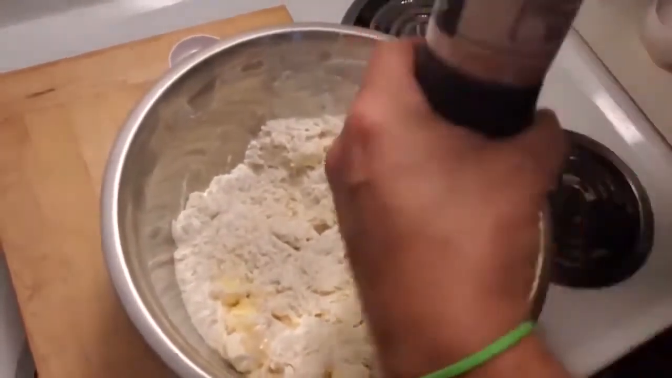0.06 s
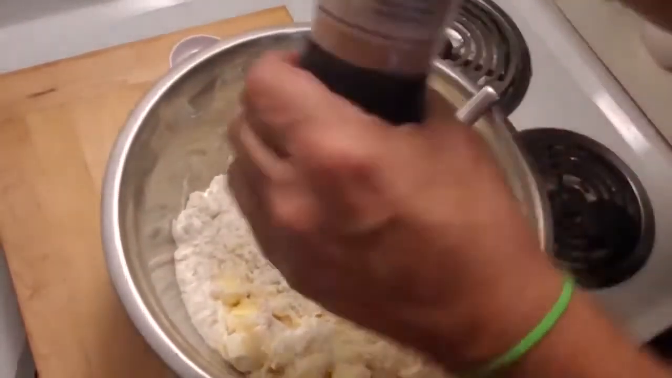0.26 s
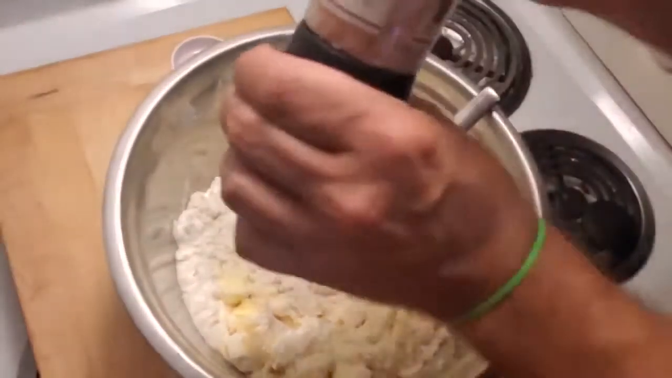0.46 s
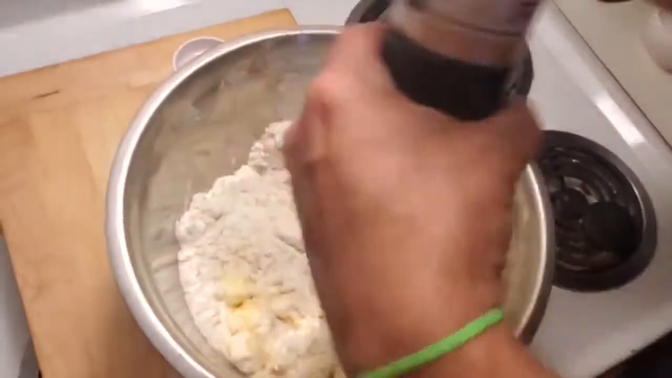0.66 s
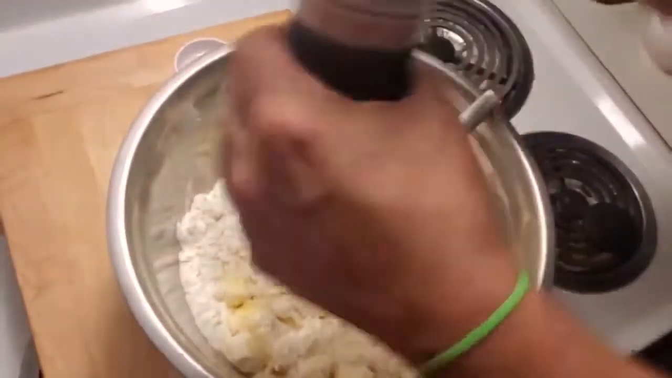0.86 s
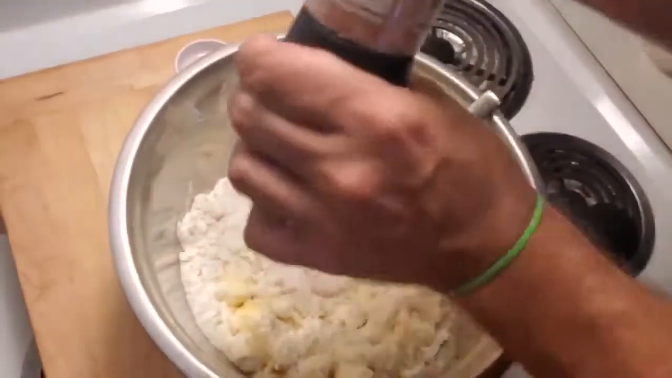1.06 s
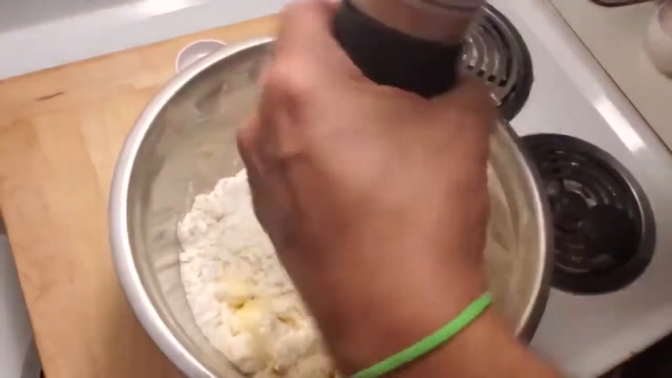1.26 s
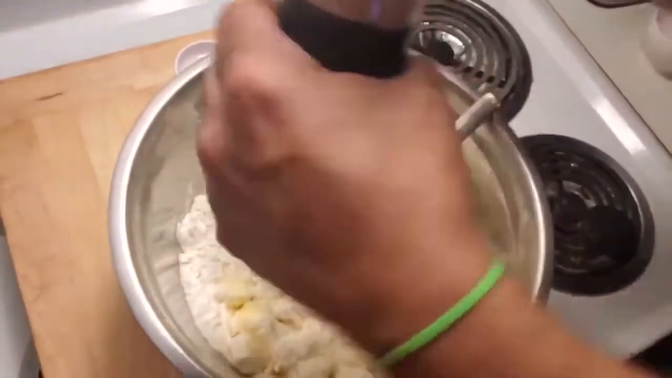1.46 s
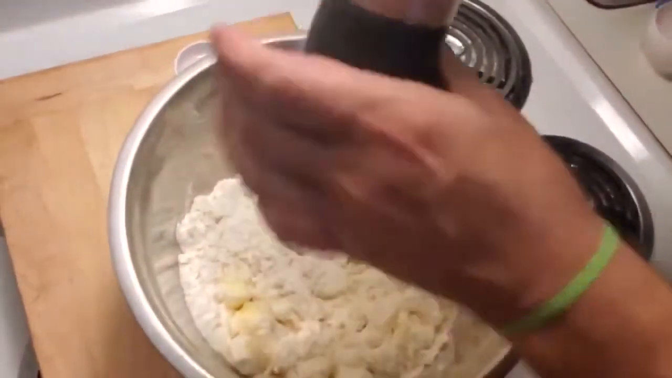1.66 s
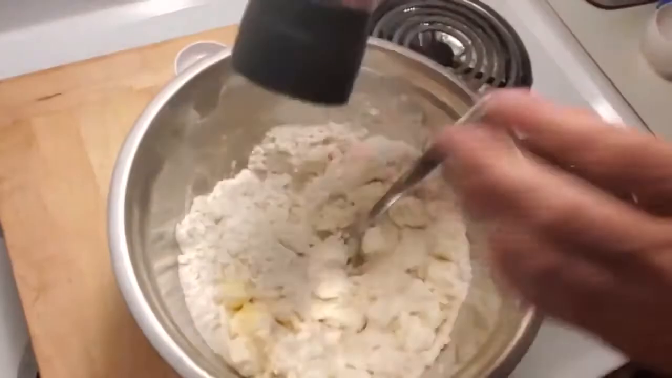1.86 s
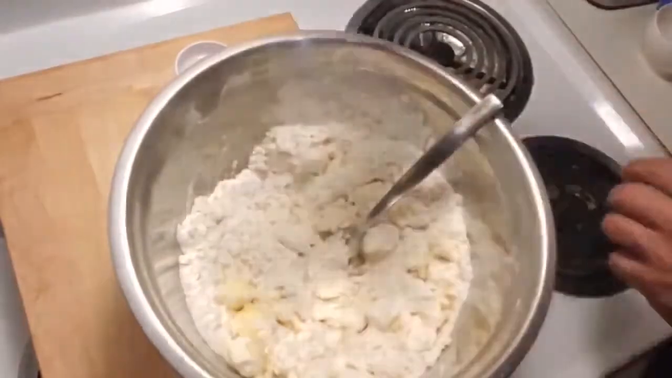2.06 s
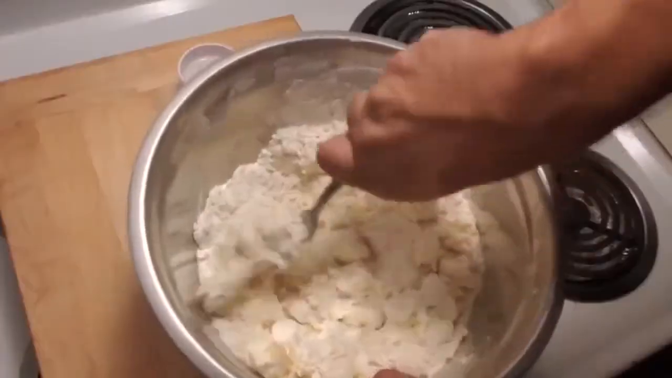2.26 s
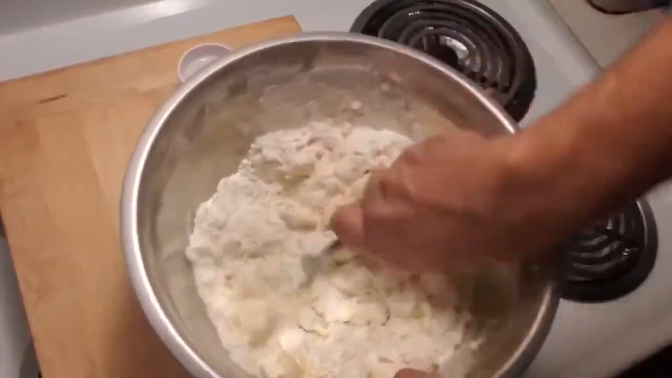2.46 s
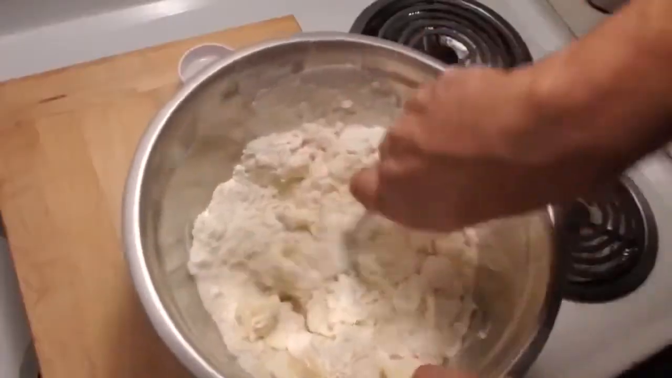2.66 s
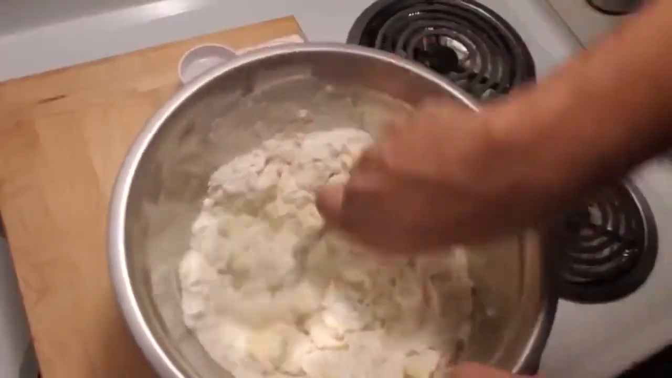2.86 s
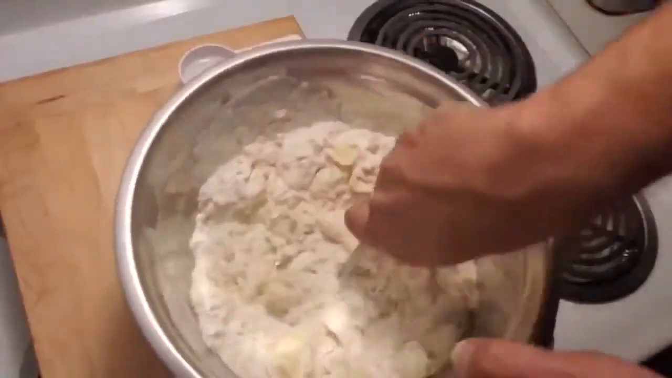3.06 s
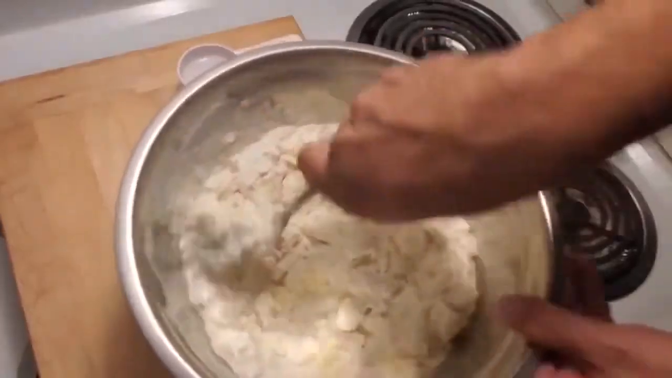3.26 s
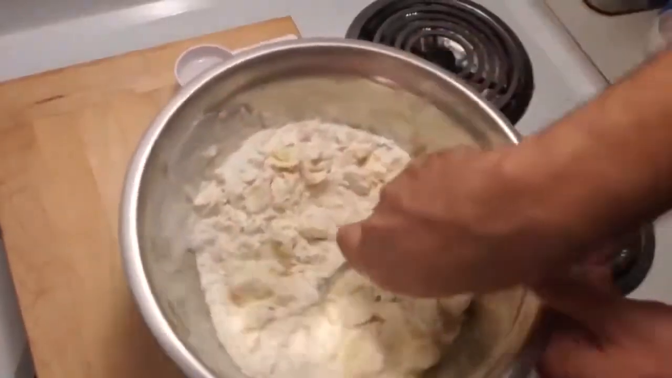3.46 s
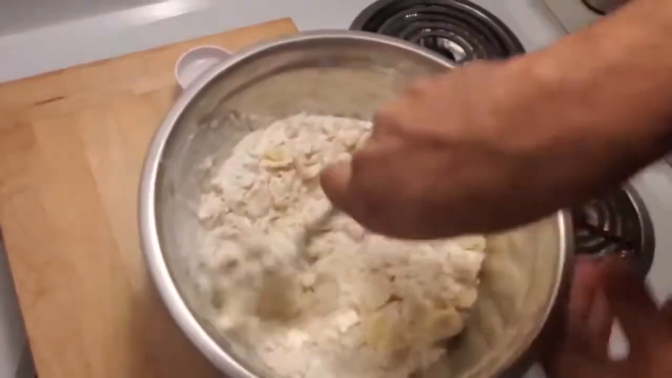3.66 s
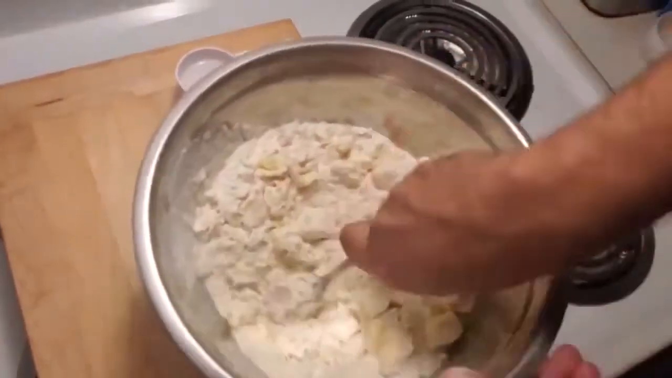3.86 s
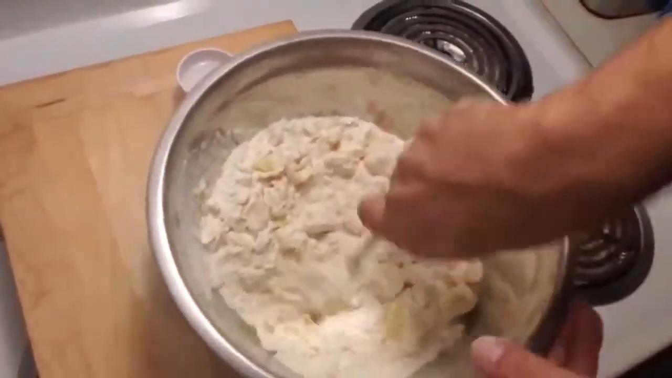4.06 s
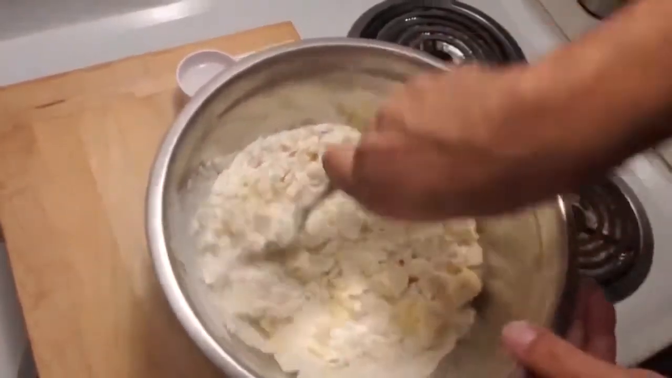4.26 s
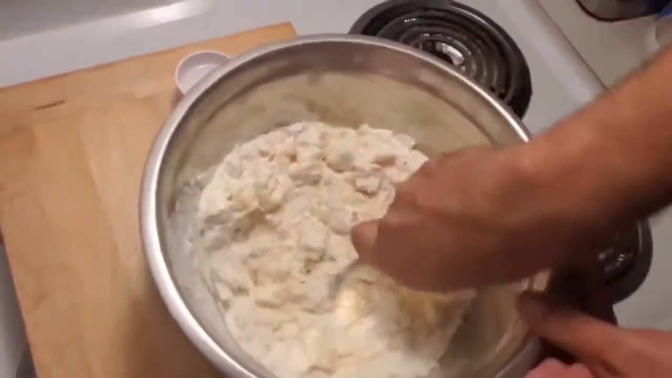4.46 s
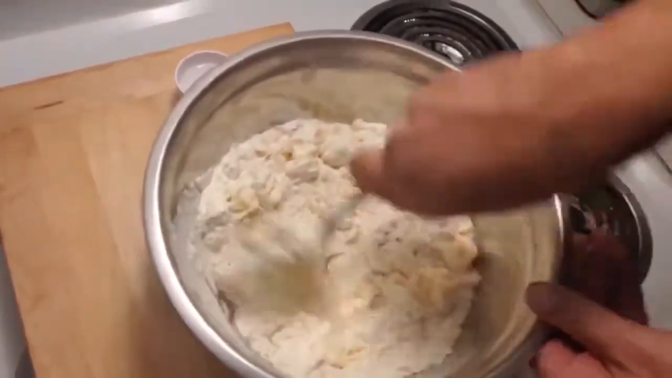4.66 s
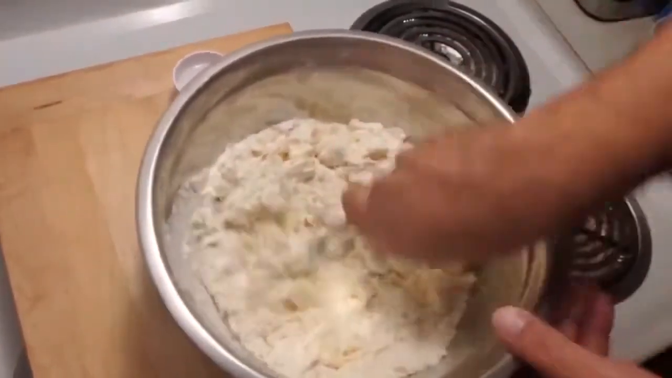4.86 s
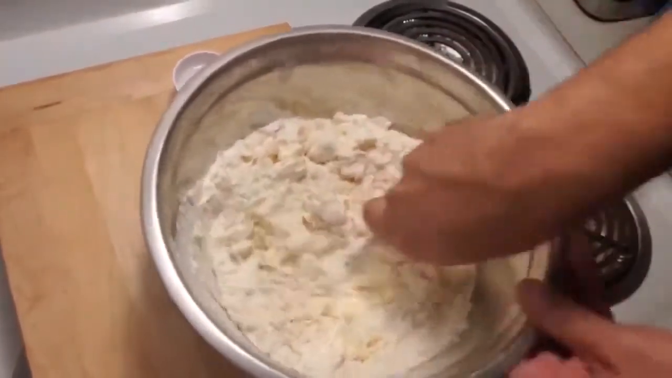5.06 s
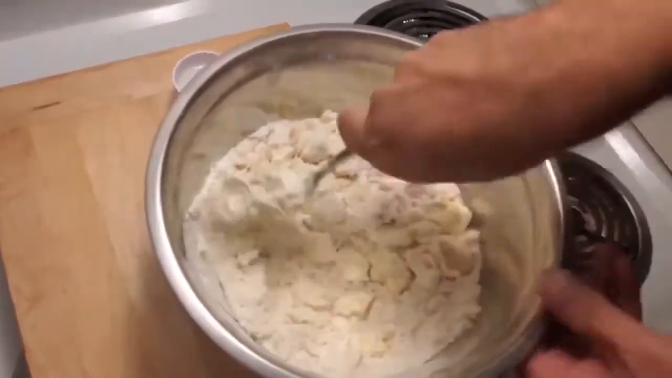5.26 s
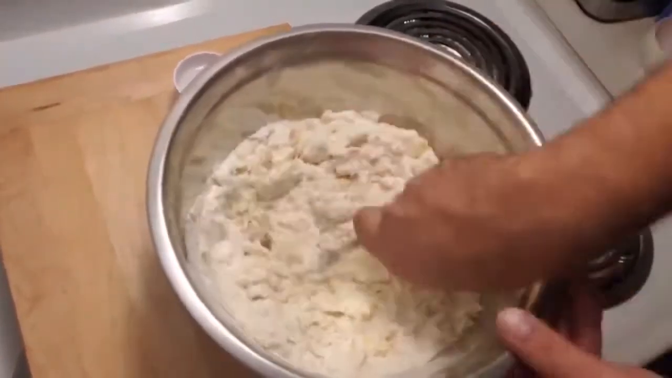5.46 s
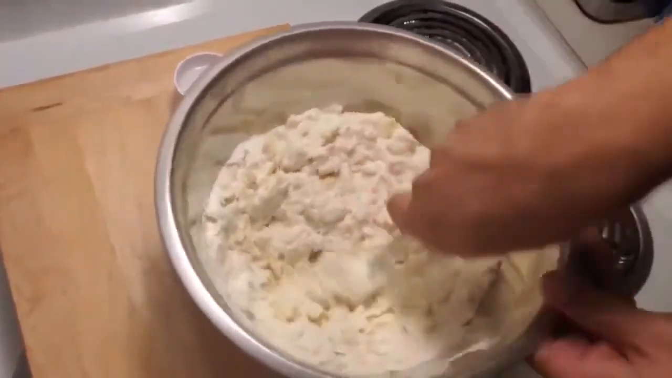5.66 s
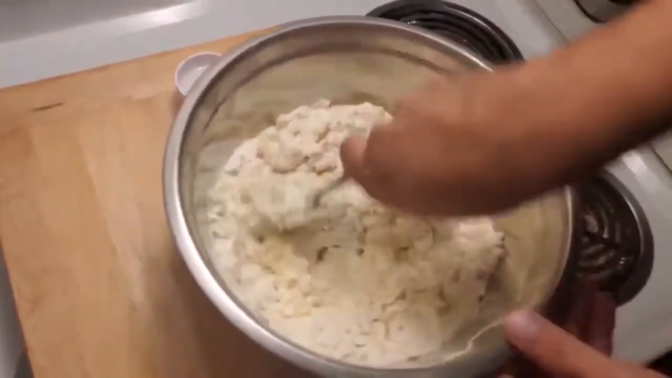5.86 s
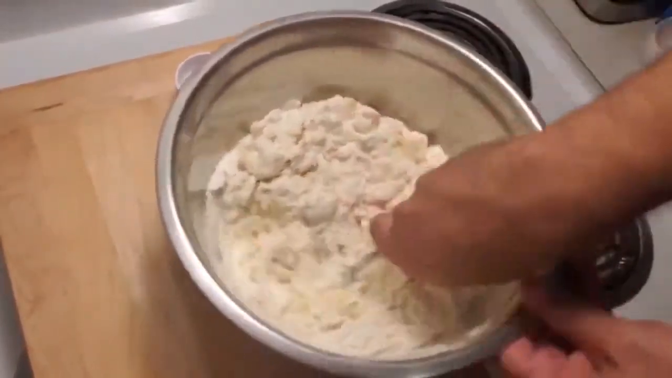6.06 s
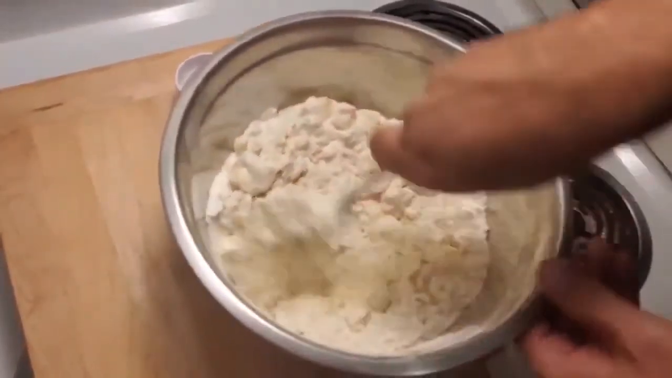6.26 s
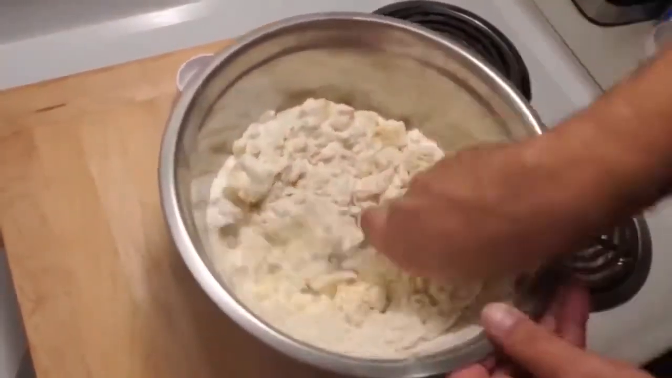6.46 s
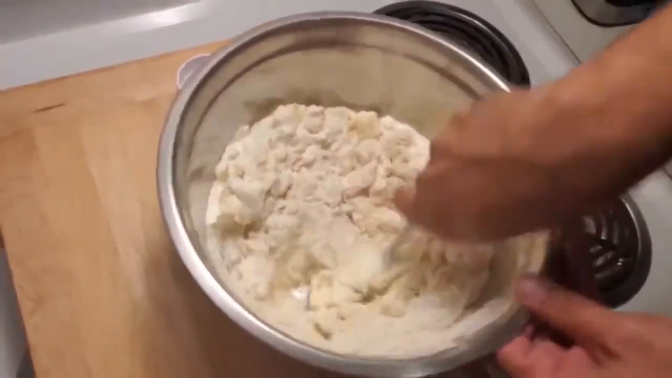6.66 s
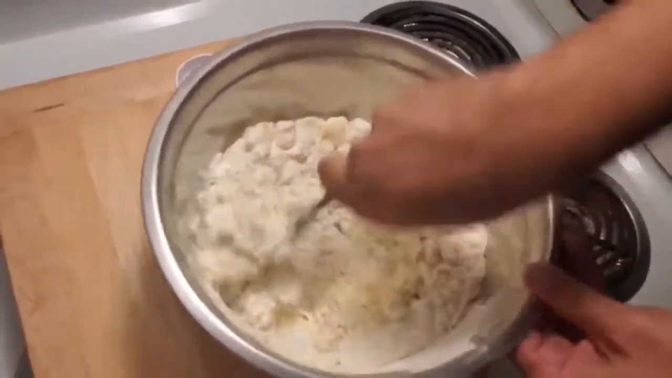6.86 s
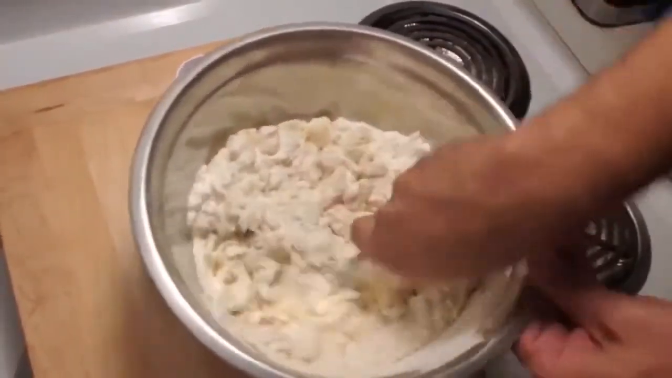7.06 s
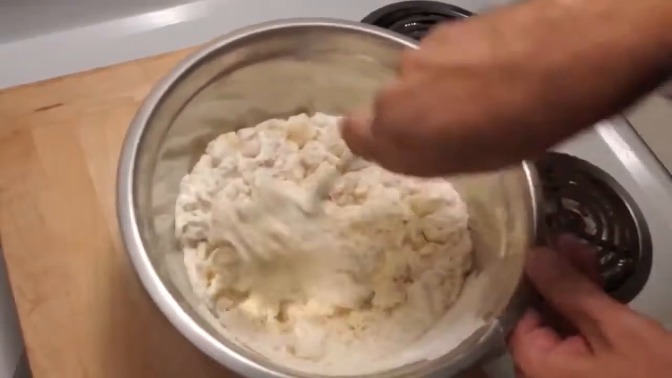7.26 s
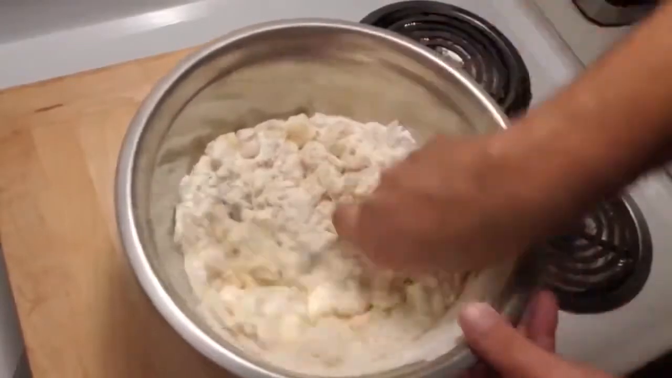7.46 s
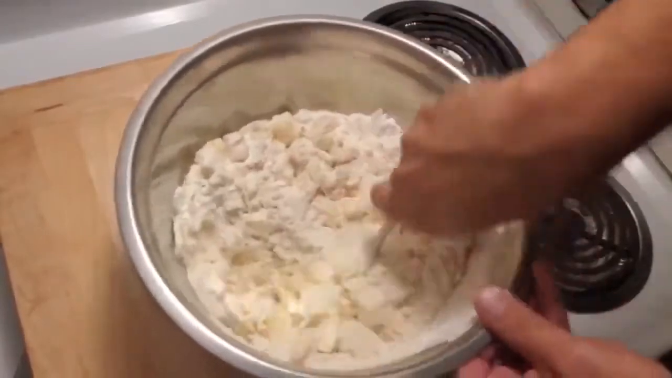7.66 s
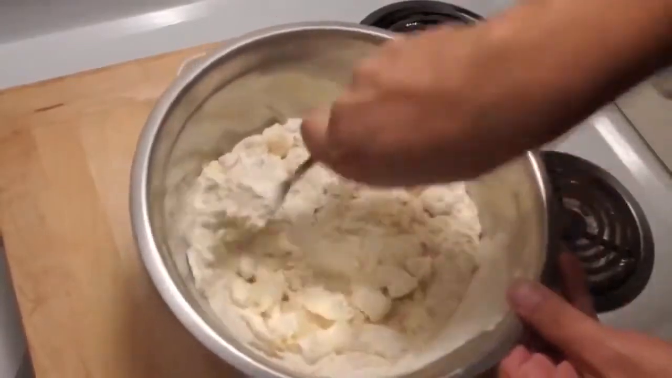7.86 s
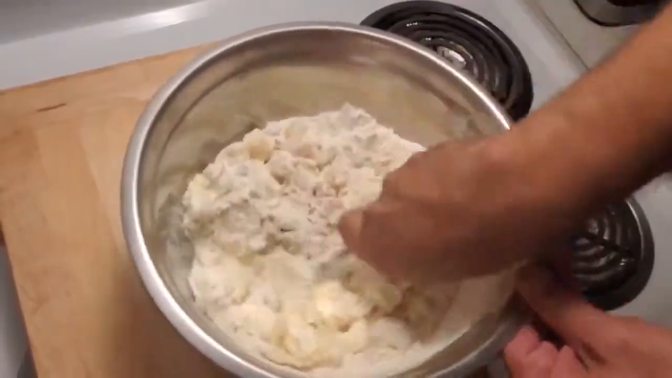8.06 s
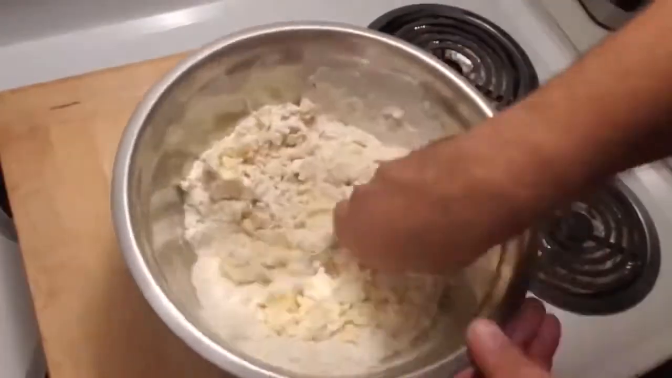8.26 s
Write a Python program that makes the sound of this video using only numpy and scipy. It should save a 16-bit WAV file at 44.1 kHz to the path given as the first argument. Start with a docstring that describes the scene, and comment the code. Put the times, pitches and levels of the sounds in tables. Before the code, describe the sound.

Close up in a quiet home kitchen, a hand mill crushes salt in uneven twists, with sharp crackles, gritty rasp and a hollow ring from its jar and casing. After about two seconds it stops, and a fork stirs flour and butter in a metal bowl, in regular soft hissing, rubbing strokes with occasional dull thuds and faint metallic clinks. Low room noise and refrigerator hum stay underneath.

```python
"""Salt mill and stirring fork

Close up in a kitchen, a hand mill crushes salt over a steel bowl: fine noise makes the grinding, short
bursts make the cracking crystals, and both set off the boom of the air in the jar and the ringing casing.
Then a fork stirs flour and butter: swells of gritty noise hiss and rub, coloured noise swells scrape, and
short thuds and rings knock the bowl on its board. A humming refrigerator and room noise lie underneath."""
import sys
import numpy as np
from scipy import signal
from scipy.fft import rfft, irfft, next_fast_len
from scipy.io import wavfile
from scipy.ndimage import uniform_filter1d, map_coordinates

SR = 44100
rng = np.random.default_rng(int(sys.argv[2]) if len(sys.argv) > 2 else 0)


def to_wav(s):
    """Save 16-bit WAV."""
    ch = np.atleast_2d(s).T  # columns
    pcm = np.round(np.clip(ch, -1, 1) * 32767)  # PCM
    wavfile.write(sys.argv[1], SR, pcm.astype(np.int16))


N = 367353  # length in samples

# Colour of the room noise: f/Hz, relative level/dB
ROOM_COLOUR = [(20, -11), (113, 1), (187, -10), (248, -3), (388, -5), (574, -18), (678, -14.5),
               (1960, -34.5), (3160, -44), (3530, -40), (6180, -38.5), (7520, -47), (12400, -40),
               (16000, -43.5)]
# Hum of the refrigerator: f/Hz, relative level/dB
FRIDGE_HUM = [(60, -68), (120, -63), (240, -64.5)]
# How alike the room noise is at left and right: f/Hz, likeness (1 = the same)
ROOM_LIKENESS = [(60, 0.94), (240, 1), (950, 0.0087), (3770, 0.08)]
# How far each source leans to the left: f/Hz, left above right/dB
MILL_LEAN = [(60, 2), (240, 5), (950, 8.5), (3770, 2.5), (15000, -3)]
BOWL_LEAN = [(60, 6), (380, 4.5), (2380, 10.5), (15000, -4)]

# Short coloured scrapes and bumps: loudest at t/s, level/dB, f/Hz, length/s
SCRAPE_SWELLS = [(2.824, -64, 1206, 0.031), (3.36, -67, 3930, 0.038), (4.542, -55.5, 5030, 0.029),
                 (5.875, -70.5, 1590, 0.067), (6.32, -55, 1990, 0.021), (6.344, -47.5, 84.5, 0.076),
                 (6.846, -50.5, 690, 0.028), (6.849, -58, 1230, 0.03), (7.12, -56, 1060, 0.022),
                 (7.328, -65, 960, 0.033), (7.847, -56, 840, 0.031)]
# Laps of the fork, a push then a pull: push t/s, rise/s, hiss level/dB, rub level/dB,
# pull later by/s, pull hiss level/dB, pull rub level/dB, trail/s (rise and trail span 20 dB)
FORK_LAPS = [(2.646, 0.095, -67, -68, 0.13, -67, -61, 0.36),
             (3.082, .12, -70.5, -67, 0.13, -69.5, -65.5, 0.46),
             (3.544, 0.036, -45, -55.5, 0.19, -60.5, -63.5, 0.1),
             (4.051, 0.087, -63, -59, 0.12, -68.5, -64.5, 0.38),
             (4.535, 0.044, -50, -54, 0.1, -67, -67.5, 0.26),
             (5.088, 0.076, -64, -65.5, 0.19, -71.5, -67, 0.31),
             (5.617, 0.14, -64.5, -65.5, 0.21, -65, -63.5, 0.17),
             (6.13, 0.078, -59.5, -64, 0.22, -60.5, -51.5, 0.11),
             (6.636, 0.082, -64, -63.5, 0.2, -63, -58.5, 0.19),
             (7.121, 0.052, -51, -55, 0.21, -63, -59, 0.12),
             (7.665, .1, -60.5, -61, 0.18, -65.5, -59, 0.17),
             (8.083, 0.0028, -49.5, -49, 0.049, -58, -57, 0.22)]
# Fork knocking the bowl: t/s, relative thud level/dB, thud f/Hz, relative ring level/dB, relative tick level/dB
BOWL_KNOCKS = [(3.509, -40, 242, -75, -66), (4.081, -55, 255, -59.5, -68), (6.283, -31.5, 160, -64, -57),
               (6.313, -48, 72.7, -48.5, -57), (6.358, -49, 73, -48, -71), (6.41, -47, 109, -63, -71),
               (6.728, -45, 67.6, -77, -75), (6.756, -47, 99, -56, -58), (7.852, -44, 514, -64, -67.5),
               (8.0824, -31, 288.5, -65, -43)]
# Colours of the flour's hiss and the dough's rub: f/Hz, relative level/dB
FLOUR_COLOUR = [(880, -27), (1500, -4.5), (1720, -11), (3030, -13.5), (3480, -4), (6830, -6.5),
                (7690, -8.5), (12600, -4), (16000, -12.5)]
DOUGH_COLOUR = [(180, -36), (300, -16), (527, -2.5), (587, -13.5), (662, -7), (1940, -23), (4000, -34),
                (5200, -71.5)]
# Resonances of the bowl on its board, the bowl wall and the fork's prongs: f/Hz, width/Hz, level/dB
BOARD_MODES = [(87, 28, 4), (247, 160, 8), (310, 94, 5.5), (630, 120, 13.5), (1066, 170, 32.5)]
STEEL_MODES = [(1682, 86, -1), (2212, 29, -1.5), (3520, 30, -9.5), (4560, 23, -3.5)]
PRONG_MODES = [(3653, 64, -1.5), (4384, 70, -0.5), (5115, 70, 1), (6424, 150, -12)]

# Swells of grinding, the last one handling noise: full level from t/s, relative level/dB, rise/s, hold/s,
# fall/s (rise and fall span 20 dB)
GRINDING_SWELLS = [(0.097, -33, 0.087, 0.029, 0.22), (0.341, -37.5, 0.032, 0.09, .1),
                   (0.484, -21.5, 0.067, 0.038, 0.073), (0.723, -33, 0.039, 0.26, 0.066),
                   (1.031, -26, 0.056, 0.096, .12), (1.338, -37, 0.013, .28, .1),
                   (1.651, -27, 0.038, 0.026, 0.088), (2.046, -49, 0.066, 0.017, 0.03)]
# Short bursts, mostly cracking crystals: t/s, relative level/dB, snap f/Hz, relative jar boom level/dB,
# relative treble level/dB
BURSTS = [(0.0413, -29, 1630, -14, -14), (0.0777, -33, 2180, -31.5, 7), (0.0992, -21, 1740, -13, -0.5),
          (0.1507, -20, 3550, -10, 2), (0.2065, -17, 3500, -14.5, 3), (0.3955, -16.5, 4600, -21, -4),
          (0.4124, -19, 3160, -14.5, -0.5), (0.4614, -15, 4180, -23.5, -11), (0.4948, -12, 2800, -25, 3),
          (0.5316, -8, 3130, -32, -9), (0.5403, -10, 3520, -25, -10), (0.5674, -22, 4000, -35, -8),
          (0.6039, -27.5, 2550, -36, 9.5), (0.7233, -23.5, 2740, -11.5, 3), (0.8715, -16.5, 1460, -22.5, 1),
          (0.9004, -23, 3900, -15.5, 3), (1.0401, -12, 1430, -15.5, -5.5), (1.0655, -14.5, 3350, -22, 6),
          (1.1068, -10, 1360, -32.5, -6), (1.1173, -10, 1900, -29.5, -1.5),
          (1.1488, -10, 3250, -25.5, -1.5), (1.172, -21, 3220, -29, 2.5), (1.2296, -4.5, 2900, -22, -7),
          (1.3339, -24, 4100, -11, -2), (1.388, -23, 3000, -30, 0.5), (1.3950, -14.5, 3960, -14.5, -3.5),
          (1.4902, -9, 3890, -16.5, 0.5), (1.5314, -14.5, 2590, -26.5, -1), (1.6482, -17, 4050, -11.5, 0.5),
          (1.6896, -11, 3330, -12, 3.5), (2.044, -41, 4400, -40, 6), (2.0595, -29.5, 2160, -40, 1),
          (2.08, -40, 2300, -43, 7), (2.174, -44.5, 2700, -40, -14), (2.184, -43, 4620, -22, 7)]
# Colour of crushed salt: f/Hz, relative level/dB
SALT_COLOUR = [(470, -43.5), (800, -6.5), (1030, -8), (1480, -4), (2210, -4.5), (3220, -1), (6330, -8),
               (7450, -14), (12500, -6.5), (15000, -15.5), (16000, -23)]
# Resonances of the air in the jar: f/Hz, width/Hz, relative level/dB
JAR_MODES = [(344, 330, -19.5), (693.8, 16, 3.5), (755, 32, -10)]
# Resonances of the mill's casing: f/Hz, level/dB
CASING_MODES = [(1460, -2), (1940, -3), (2570, -3), (3270, -1.5), (4050, 0.5), (5240, -6)]

POINTED = 1.25  # shape of a swell's top
USUAL_DB, HALVING_DB = -63, 16  # a push HALVING_DB louder than USUAL_DB falls in half the time
PUSH_FALL_S = 0.17  # time to fall 20 dB, for a push at USUAL_DB
PULL_RISE = 0.87  # a pull's rise, as a share of the time since the push
IDLE_DB = -93.5  # flour settling between strokes
CRUMBLE_DB, RUSTLE_DB = -13, -56.5  # crumbling against its burst; rustle under the grinding swells
TREBLE_HZ = 5495  # where a burst's treble begins
CASING_Q, CHIPS_PER_S = 30, 120  # sharpness of the casing's ring; small snaps at random times
MILL_END_S = 2.2  # small snaps fall before this, stirring comes after
TOP_HZ = 15900  # the recorder's upper limit


def amp(db):
    """Gain of a level in dB."""
    return 10 ** (np.asarray(db) / 20)


def unit(x):
    """Scale x to an rms (average strength) of 1."""
    return x / np.sqrt(np.mean(x ** 2) + 1e-20)


def along(points, hz):
    """Read a curve of (f/Hz, value) points, joined by straight lines on a log axis."""
    f, v = np.transpose(points)
    return np.interp(np.log(hz + 1), np.log(f + 1), v)


def wobble(rate):
    """A smooth random curve through rate random points a second."""
    points = rng.standard_normal(int(N * rate / SR) + 4)
    return map_coordinates(points, [np.arange(N) * rate / SR])


def filtered(x, response):
    """Shape the spectrum of x by a response that depends on frequency."""
    m = next_fast_len(N + SR // 2)
    return irfft(rfft(x, m) * response(np.fft.rfftfreq(m, 1 / SR)), m)[..., :N]


def causal(spectrum, size=4096):
    """A pulse of energy 1 with this colour that starts at once (minimum phase)."""
    log_gain = np.log(amp(along(spectrum, np.fft.rfftfreq(size, 1 / SR))) + 1e-6)
    cepstrum = irfft(log_gain, size)
    # folding the second half onto the first leaves nothing ahead of the start
    cepstrum[1:size // 2] *= 2
    cepstrum[size // 2 + 1:] = 0
    pulse = irfft(np.exp(rfft(cepstrum)), size)[:size // 2]
    return pulse / np.linalg.norm(pulse)


def through(x, spectrum):
    """Colour x without any sound ahead of its blows."""
    return signal.fftconvolve(x, causal(spectrum)[None], axes=1)[:, :N]


def modes(table):
    """Response of (f/Hz, width/Hz, level/dB) resonances, added with alternating sign."""
    def response(f):
        total = 0
        for k, (centre, width, db) in enumerate(table):
            damping = 1j * f * width
            total = total + (-1) ** k * amp(db) * damping / (centre * centre - f * f + damping)
        return total
    return response


def pair(n, alike):
    """White noise left and right, sharing only a part: the sound scatters off bowl and hands."""
    a, b = rng.standard_normal((2, n))
    turn = np.arccos(np.clip(alike, 0, 1)) / 2
    return np.cos(turn) * a + np.sin(turn) * np.array([b, -b])


def placed(x, lean):
    """Put a source to one side, by a different amount at each frequency."""
    return filtered(x, lambda hz: amp(np.outer([.5, -.5], along(lean, hz))))


def grit(spiky_db, clump_db, clump_rate, patchy_db, alike, size=3):
    """Tiny fractures at rms 1: noise with random strength, clumps and a colour that keeps changing."""
    spikes_db = spiky_db * np.minimum(rng.exponential(size=N), 7)
    x = pair(N, alike) * amp(spikes_db + clump_db * wobble(clump_rate))
    z = signal.stft(x, nperseg=128)[2]
    colour = uniform_filter1d(rng.standard_normal(z.shape[1:]), size=2, axis=0)  # smooth over frequency
    colour = uniform_filter1d(colour, size=size, axis=1)  # smooth over time
    patchy = z * amp(patchy_db * unit(colour))
    return unit(signal.istft(patchy, nperseg=128)[1][:, :N])


def swells(s, db, rise, hold, fall, base_db):
    """Level in dB of overlapping swells above a base, adding their powers."""
    steps = np.arange(0, N, 32)
    d = steps / SR - s[:, None]
    before = np.maximum(-d / rise[:, None], 0)
    after = np.maximum((d - hold[:, None]) / fall[:, None], 0)
    level_db = db[:, None] - 20 * (before + after) ** POINTED
    power = np.sum(amp(level_db) ** 2, axis=0) + amp(base_db) ** 2
    return np.interp(np.arange(N), steps, 10 * np.log10(power))


def kitchen():
    """Room noise, most alike left and right in the bass, with a wavering refrigerator hum."""
    turn = lambda hz: np.arccos(np.clip(along(ROOM_LIKENESS, hz), -1, 1)) / 2
    shape = lambda hz: amp(along(ROOM_COLOUR, hz)) * [np.cos(turn(hz)), np.sin(turn(hz))]
    mid, side = filtered(rng.standard_normal((2, N)), shape)
    air = amp(-58.5 + 0.29 * wobble(2.7)) * unit(np.array([mid + side, mid - side]))
    t = np.arange(N) / SR
    hum = np.zeros(N)
    for hz, db in FRIDGE_HUM:
        level = amp(db + 2 + 1.9 * wobble(5.4))
        hum += level * np.sin(2 * np.pi * hz * t + 1.1 * wobble(14))
    # starts 3 dB louder and sinks to its later level from 1.8 to 2.2 s
    louder_db = np.interp(t, [1.8, 2.2], [3, 0])
    return placed(amp(louder_db) * (air + hum), BOWL_LEAN)


def scrapes():
    """Gritty noise swells up and away, each time in a frequency band of its own."""
    t = np.arange(N) / SR
    rough = grit(spiky_db=2.5, clump_db=1.0, clump_rate=150, patchy_db=-1.5, alike=0.81)
    total = np.zeros((2, N))
    for s, db, hz, length in SCRAPE_SWELLS:
        band = modes([(hz, 0.3 * hz, 0)])
        colour = unit(filtered(rough, lambda f: band(f) ** 2))
        total += amp(db) * np.exp(-2 * ((t - s) / length) ** 2) * colour
    return placed(total, BOWL_LEAN)


def stirring():
    """Hiss and rub levels in dB: louder pushes end sooner, pulls swell from the push on."""
    s, rise, hiss, rub, later, pull_hiss, pull_rub, trail = np.transpose(FORK_LAPS)
    quick = .5 ** ((hiss - USUAL_DB) / HALVING_DB)
    times = np.r_[s, s + later]
    rises = np.r_[rise, PULL_RISE * later]
    falls = np.r_[PUSH_FALL_S * quick, trail]
    begun_db = np.where(np.arange(N) > MILL_END_S * SR, 0, -60)  # hardly any stirring before this
    hiss_db = swells(times, np.r_[hiss, pull_hiss], rises, 0 * times, falls, IDLE_DB)
    rub_db = swells(times, np.r_[rub, pull_rub], rises, 0 * times, falls, IDLE_DB)
    return hiss_db + begun_db, rub_db + begun_db


def fork():
    """Strokes hiss through flour and rub the dough; contacts thud on the board and ring the steel."""
    hiss_db, rub_db = stirring()
    crumbs = grit(spiky_db=0.3, clump_db=0.5, clump_rate=88, patchy_db=1.84, alike=0.048, size=40)
    hiss = amp(hiss_db) * unit(through(crumbs, FLOUR_COLOUR))
    lumps = grit(spiky_db=-0.5, clump_db=2, clump_rate=36, patchy_db=4, alike=0.27)
    rub = amp(rub_db) * unit(through(lumps, DOUGH_COLOUR))

    push, tap, thud, tick = np.zeros((4, 2, N + SR))
    t = np.arange(SR // 8) / SR
    soft = np.hanning(round(0.00261 * SR))  # dough cushions the contact and dulls it
    soft = soft / np.linalg.norm(soft)
    for s, thud_db, hz, ring_db, tick_db in BOWL_KNOCKS:
        at = slice(round(s * SR), round(s * SR) + len(t))
        # -60 * t / d means a fall of 60 dB in d seconds
        rattle = pair(len(t), alike=0.49) * amp(-60 * t / 0.068)
        push[:, at] += amp(thud_db - 7.5) * signal.lfilter(soft, 1, rattle)
        thud[:, at] += amp(thud_db - 5.0 - 60 * t / 0.14) * np.sin(2 * np.pi * hz * t)
        tap[:, at] += amp(ring_db + 22.0 - 60 * t / 0.085) * pair(len(t), alike=0.2)
        tick[:, at] += amp(tick_db - 60 * t / 0.0067) * pair(len(t), alike=0.24)
    push, tap, thud, tick = push[:, :N], tap[:, :N], thud[:, :N], tick[:, :N]

    board = filtered(push, modes(BOARD_MODES)) + thud
    steel = filtered(tap + amp(7.0) * hiss, modes(STEEL_MODES))
    prongs = np.zeros((2, N))
    for prong in PRONG_MODES:
        stroked = amp(-6 + 6.7 * wobble(12)) * hiss  # each prong sings now and then
        prongs += filtered(amp(24.5) * tick + stroked, modes([prong]))
    return placed(hiss + rub + board + steel + prongs + through(tick, FLOUR_COLOUR), BOWL_LEAN)


def casing(crush_db):
    """Every burst and many small snaps ring the casing, each with its own mix of its resonances."""
    s, burst_db, snap_hz, *_ = np.transpose(BURSTS)
    chance = rng.random((round(CHIPS_PER_S * MILL_END_S), 2))
    chips = (chance[:, 0] * MILL_END_S * SR).astype(int)
    chip_db = crush_db[chips] + 24 - 5 * np.log(chance[:, 1] + .06)  # few strong, many weak
    at = np.r_[np.round(s * SR).astype(int), chips]
    blow_db = np.r_[burst_db + 20, chip_db]
    mix = rng.standard_normal((len(at), len(CASING_MODES), 2))
    octaves = np.log2(np.transpose(CASING_MODES)[0] / snap_hz[:, None])[..., None]
    # a burst favours the resonances near its snap
    mix[:len(s)] = (1 + 0.25 * mix[:len(s)]) * amp(-14 * np.abs(octaves))
    ring = np.zeros((2, N))
    for k, (hz, db) in enumerate(CASING_MODES):
        blows = [np.bincount(at, amp(blow_db) * mix[:, k, side], N) for side in range(2)]
        ring += filtered(np.array(blows), modes([(hz, hz / CASING_Q, db)]))
    return ring


def mill():
    """Grinding grit and short bursts take on the salt's colour; both drive the air in the jar."""
    rustle_db = np.where(np.arange(0, N, 32) < 2.1 * SR, RUSTLE_DB, -120)
    crush_db = swells(*np.transpose(GRINDING_SWELLS), rustle_db)
    grains = amp(crush_db) * grit(spiky_db=2.0, clump_db=2.0, clump_rate=170, patchy_db=3.0, alike=0.1)

    blows, snaps, thumps = np.zeros((2, N)), np.zeros((2, N)), np.zeros(N)
    t = np.arange(SR // 8) / SR
    high_pass = signal.butter(2, TREBLE_HZ, "high", fs=SR)
    low_pass = signal.butter(2, TREBLE_HZ, fs=SR)
    for s, db, hz, boom_db, treble_db in BURSTS:
        at = slice(round(s * SR), round(s * SR) + len(t))
        burst = amp(-60 * t / 0.0031)
        crumbling = (s < 2.1) * amp(CRUMBLE_DB - 60 * t / 0.072)  # only for bursts before 2.1 s
        echoes = 0.037 * amp(-60 * t / 0.32)
        onset = 1 - np.exp(-t / 0.00014)
        shards = pair(len(t), alike=0.16) * (burst + crumbling + echoes) * onset
        highs = signal.lfilter(*high_pass, shards)
        lows = signal.lfilter(*low_pass, shards)
        # minus, as the two filters turn the sound opposite ways
        blows[:, at] += amp(db - 1.5) * (lows - amp(treble_db) * highs)
        phase = rng.normal(0, .6) * np.array([[1], [-1]])  # the snap reaches the two sides a little apart
        snap = np.sin(2 * np.pi * hz * t + phase) * (1 - np.exp(-t / 0.00046))
        snaps[:, at] += amp(db - 60 * t / 0.0092) * snap
        thumps[at.start] = amp(db + boom_db + 46.5)

    driving = np.arange(N) < 1.8 * SR  # after 1.8 s the grains no longer drive the jar
    grinding = amp(8.0) * driving * (grains + 0.68 * grains[::-1])  # each side also gets the other
    boom = filtered(grinding + thumps, modes(JAR_MODES))
    salt = through(amp(-4.0) * grains + blows, SALT_COLOUR)
    return placed(salt + snaps + boom + casing(crush_db), MILL_LEAN)


def scene():
    """Room, scrapes, fork and mill together."""
    return kitchen() + scrapes() + fork() + mill()


def record(dry):
    """The recorder cuts steeply at its upper limit."""
    return filtered(dry, lambda hz: 1 / (1 + (hz / TOP_HZ) ** 120))


dry = scene()
out = record(dry)
to_wav(out)
```